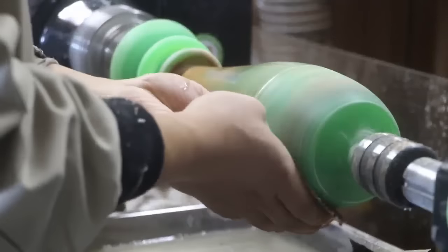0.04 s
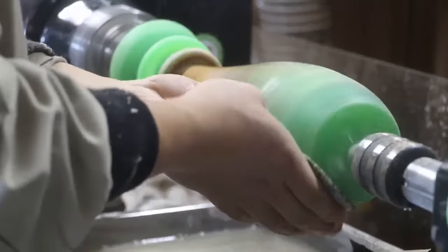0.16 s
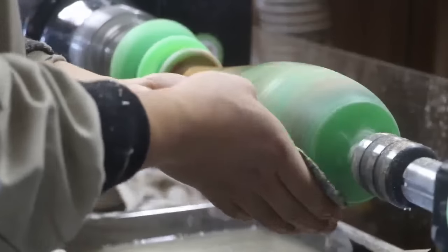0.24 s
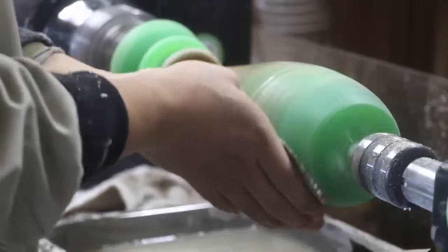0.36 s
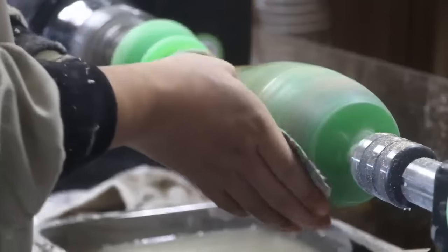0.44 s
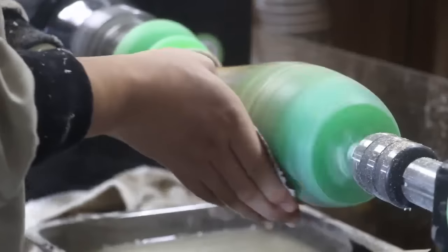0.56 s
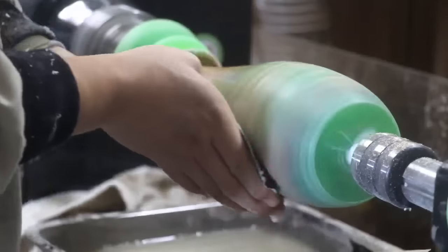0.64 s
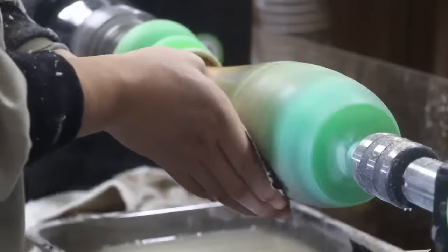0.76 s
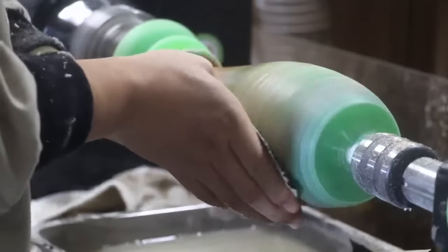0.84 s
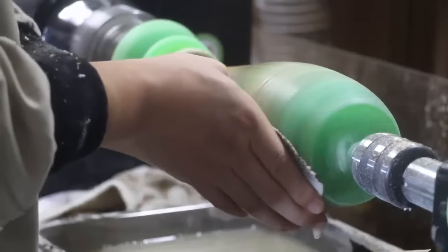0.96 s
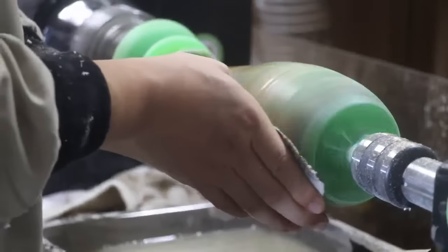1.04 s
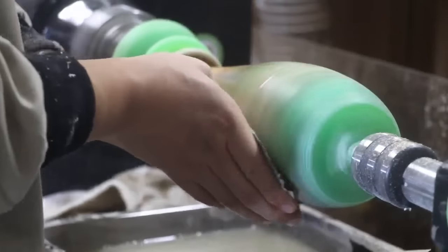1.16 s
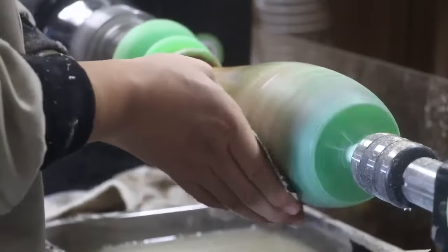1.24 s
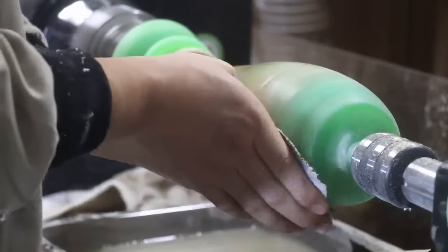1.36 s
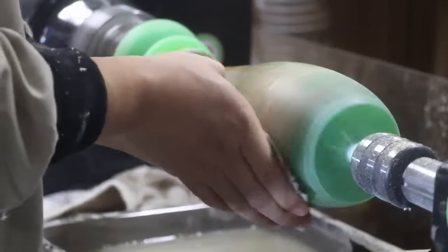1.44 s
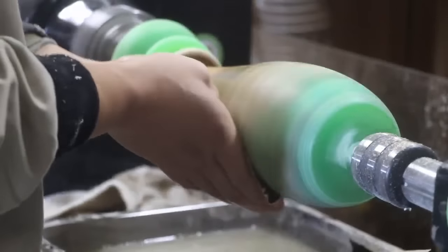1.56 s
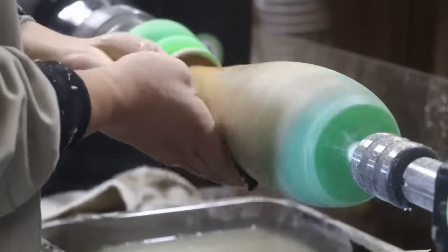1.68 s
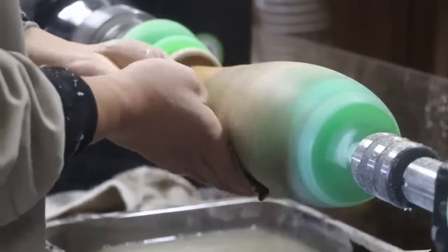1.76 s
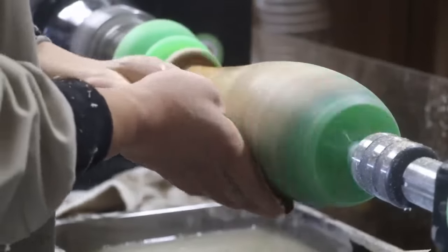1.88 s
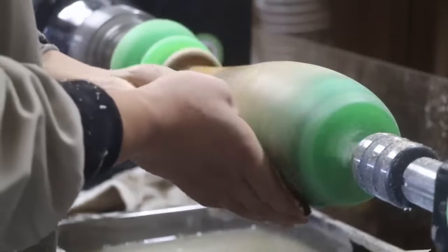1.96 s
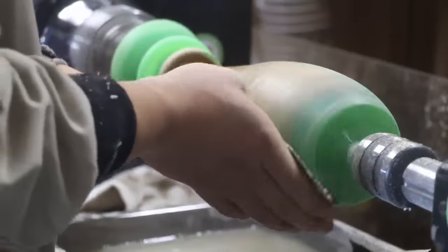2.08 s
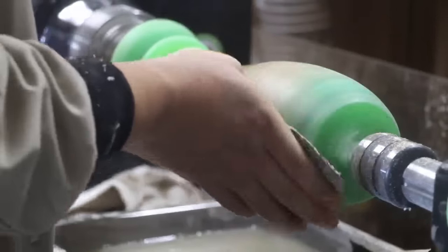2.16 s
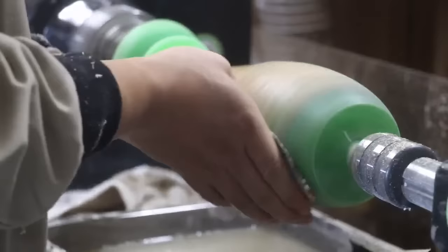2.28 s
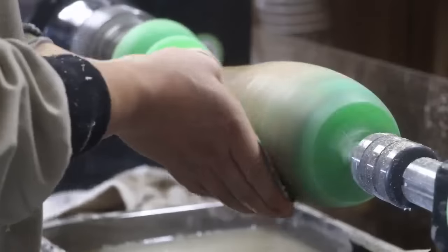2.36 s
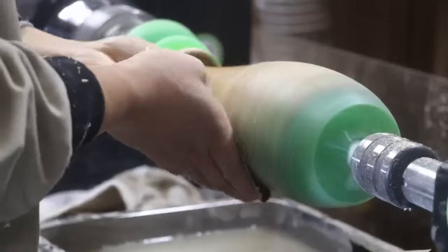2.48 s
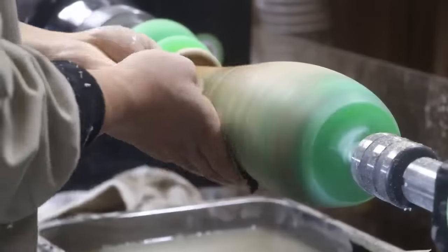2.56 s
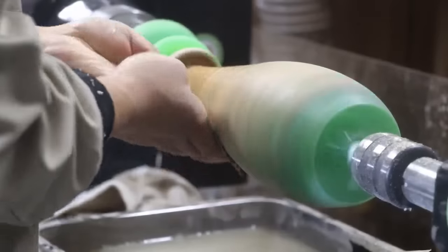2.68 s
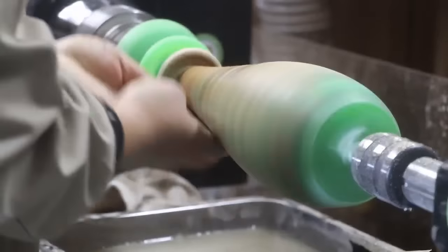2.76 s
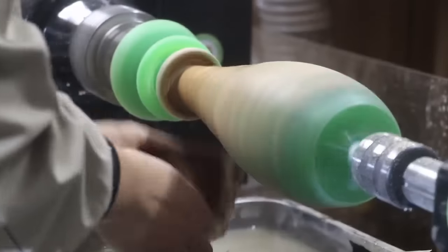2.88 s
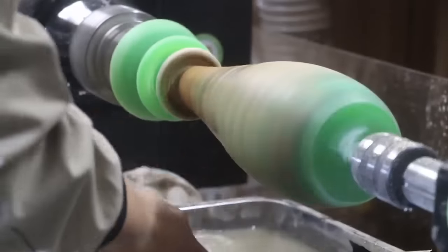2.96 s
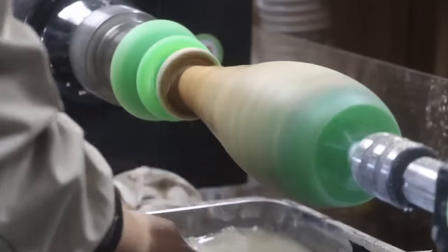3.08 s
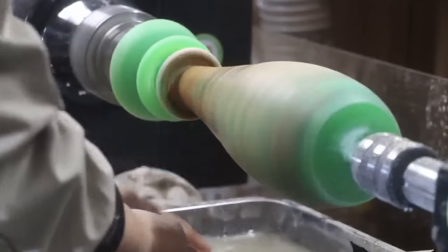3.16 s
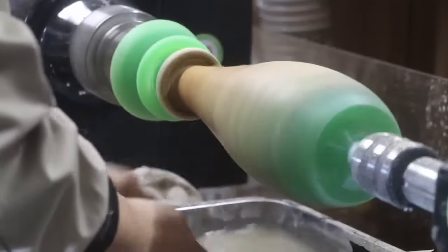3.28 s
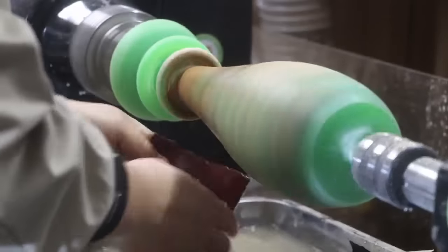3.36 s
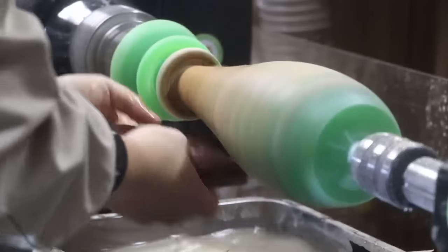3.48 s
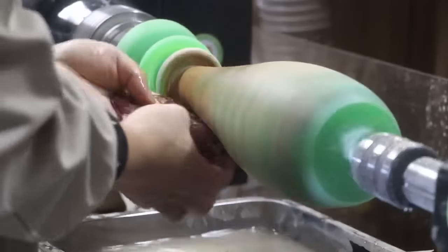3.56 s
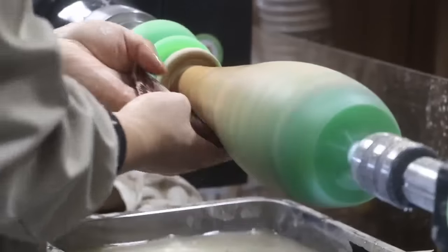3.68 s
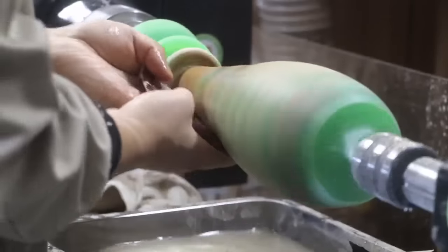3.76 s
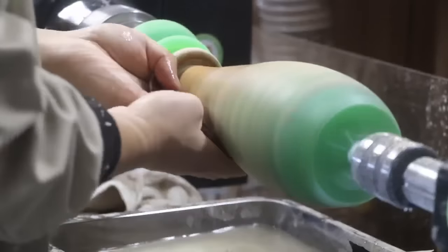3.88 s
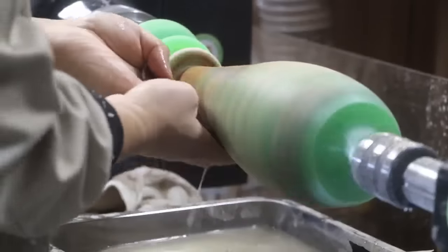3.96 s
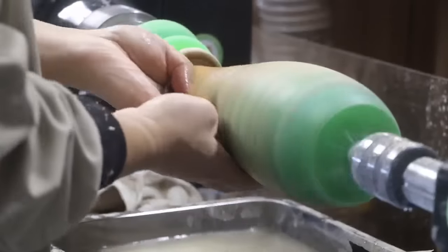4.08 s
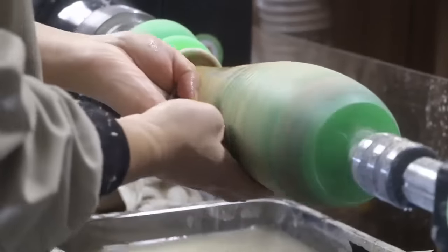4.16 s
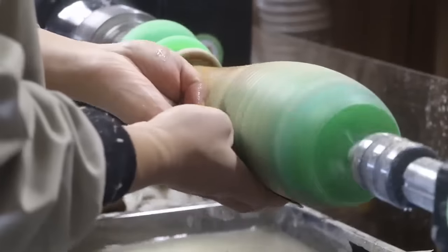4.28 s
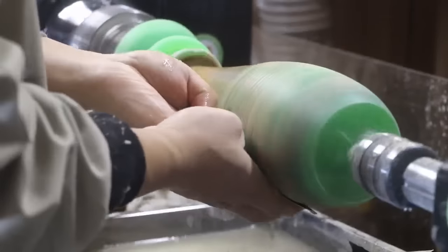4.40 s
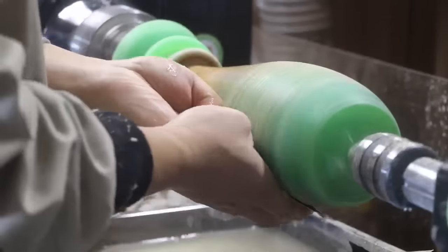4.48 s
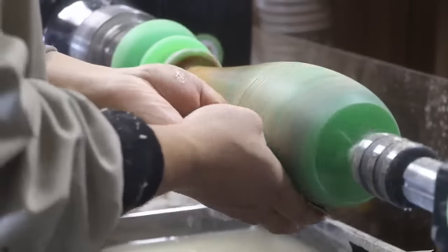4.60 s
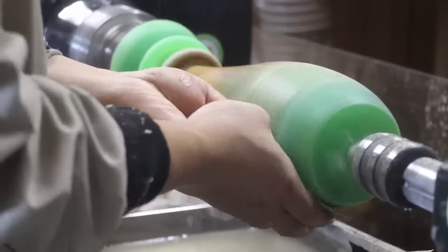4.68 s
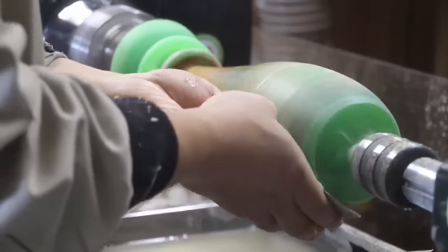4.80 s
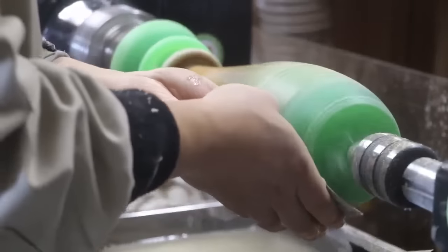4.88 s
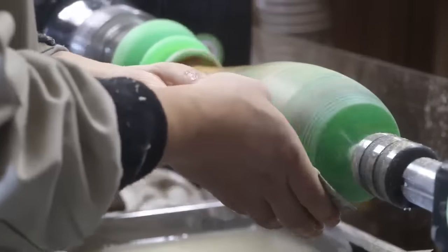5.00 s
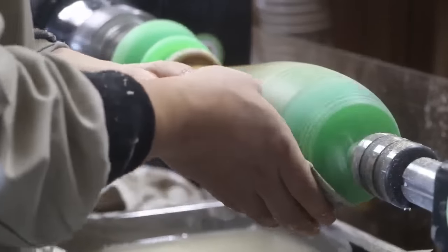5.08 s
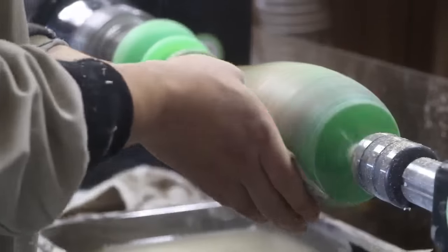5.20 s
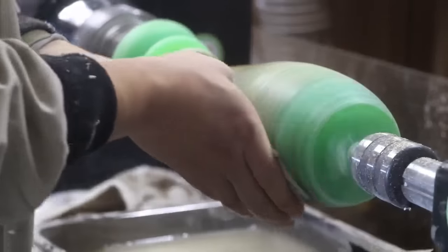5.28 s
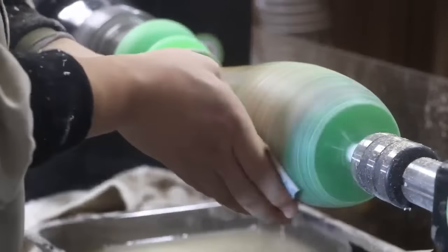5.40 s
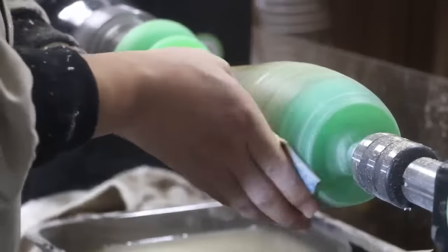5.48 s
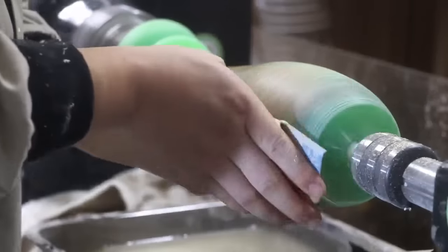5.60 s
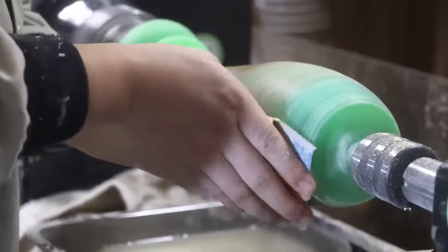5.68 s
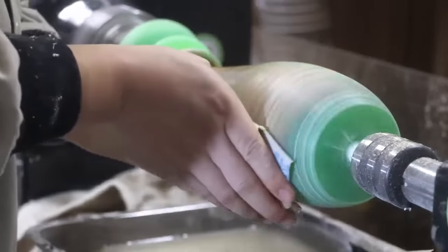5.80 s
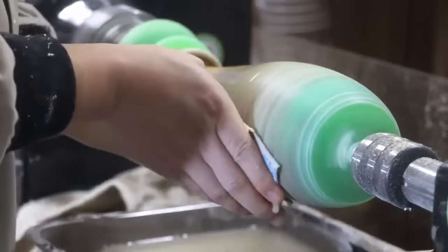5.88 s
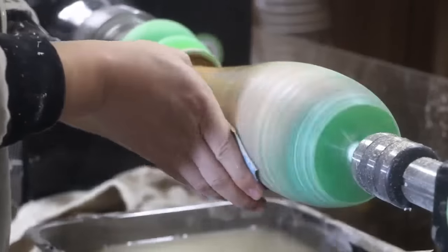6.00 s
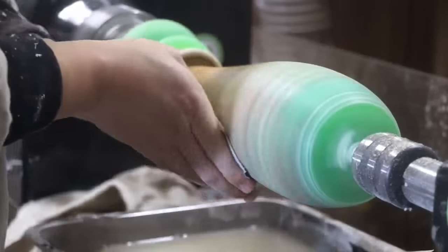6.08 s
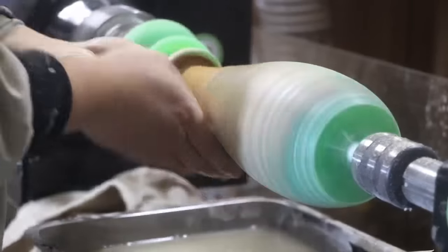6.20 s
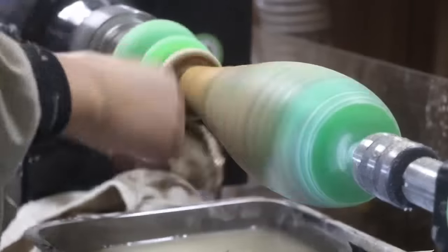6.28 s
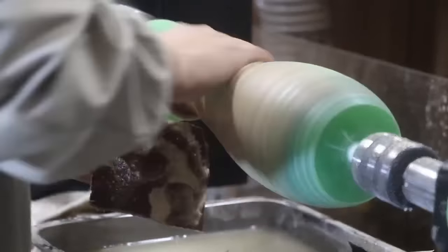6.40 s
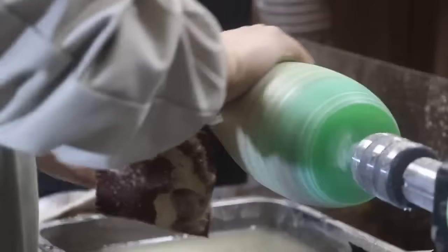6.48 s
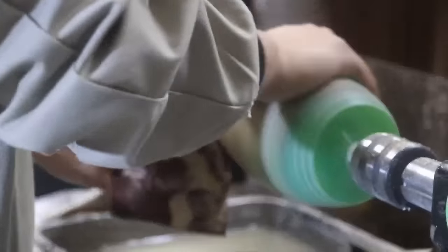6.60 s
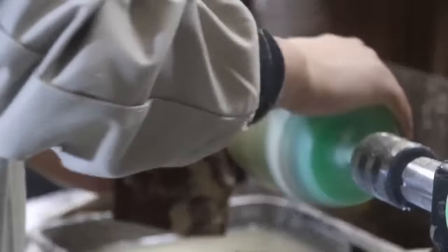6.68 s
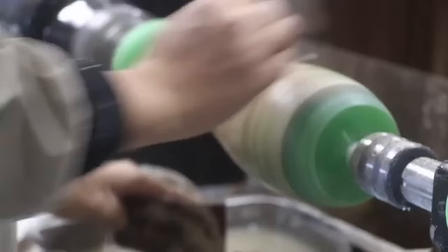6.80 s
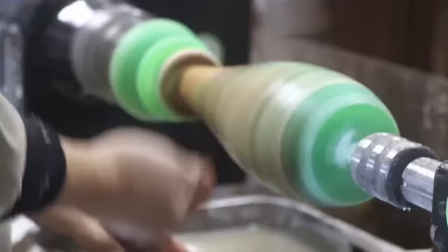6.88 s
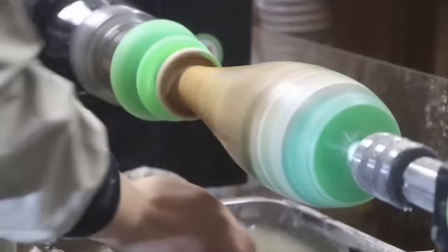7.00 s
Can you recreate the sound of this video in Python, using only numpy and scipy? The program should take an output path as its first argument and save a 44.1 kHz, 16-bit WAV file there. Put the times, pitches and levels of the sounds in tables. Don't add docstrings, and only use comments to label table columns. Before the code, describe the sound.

From 0 s, wet sandpaper is already pressed on a workpiece spinning on a lathe, close and to the right of a stereo microphone. It makes a dense, bright, gritty hiss with a hollow, cupped colour around the upper midrange, surging irregularly as the paper grabs; a small wet squeak catches near 0.65 s and pressure swells around 1.8 s. At about 2.9 s the paper lifts sharply, exposing low motor rumble and mains-like hum. Small splashes, wet chirps and short swishes follow at 3.1-3.5 s as it is rinsed. At 3.63 s the loud rubbing returns abruptly, its hollow tone sliding lower and back, with brief singing wet spots and a strong grab near 5.5 s. It swells and stops at about 6.35 s. Faint palm wipes follow, one swelling until 6.85 s, then a tiny spray tick at 6.93 s over the continuing machine rumble.

```python
import sys
import numpy as np
from scipy import signal
from scipy.io import wavfile
from scipy.ndimage import uniform_filter1d

SR = 44100
rng = np.random.default_rng(int(sys.argv[2]) if len(sys.argv) > 2 else 0)


def generate_wav(sig):
    pcm = np.round(np.clip(np.atleast_2d(sig).T, -1, 1) * 32767).astype(np.int16)
    wavfile.write(sys.argv[1], SR, pcm)


def nominal_scale(level):
    x = np.asarray(level, float) / 20
    return 10 ** x


N = 310905


def sanding():
    grit = scratches(per_s=6000, spread_db=3.5, water=0.6)
    hz, t, z = signal.stft(grit, SR, nperseg=512, noverlap=384)
    power = paper_colour(hz, t) * pockets(hz, t)
    hiss = signal.istft(paired(z, hz) * np.sqrt(power * len(hz)), SR, nperseg=512, noverlap=384)[1][:, :N]
    t = np.arange(N) / SR
    coarse = t[::32]
    level_db = np.interp(t, coarse, contact(coarse) + grabbing(coarse)) + 0.67
    return nominal_scale(level_db) * (nominal_scale(runout(t)) * hiss + nominal_scale(-4.5) * motor_buzz(t))


def scratches(per_s, spread_db, water):
    size = nominal_scale(spread_db * np.minimum(rng.exponential(1, (2, N)), 5))
    sign = rng.choice([-1.0, 1.0], (2, N))
    bites = size * sign * (rng.random((2, N)) < per_s / SR)
    water = np.clip(water, 0, 1)
    return np.sqrt(1 - water) * evened(bites) + np.sqrt(water) * rng.standard_normal((2, N))


# (frequency [Hz], density [dB per Hz])
GRIT_SPECTRUM = [(530, -33.5), (900, -19), (1090, -19), (1440, -7.5), (1920, -7.5), (2230, -5),
                 (2570, -5.5), (3270, -6.5), (4590, -3), (5830, 5.5), (7050, -1.5), (8970, -20),
                 (9810, -30), (12800, -67.5), (21600, -120)]
# (time [s], frequency [Hz], strength [dB])
FREE_EDGE = [(0.0, 3050, -18), (0.8, 3100, -1.5), (1.08, 3370, -1), (1.3, 3500, -10), (1.6, 3300, 2.5),
             (2.12, 3100, 4.5), (2.3, 3360, 1), (2.55, 3160, 5.5), (2.85, 2900, -4), (3.2, 3150, -14),
             (3.47, 3020, -0.5), (4.04, 3320, -4), (4.5, 3000, 4), (4.9, 3800, -9), (5.4, 3170, -1),
             (5.97, 3030, 0.5), (6.25, 3120, 0.5), (6.6, 3200, -11)]


def paper_colour(hz, t):
    edge_s, edge_hz, edge_db = np.transpose(FREE_EDGE)
    edge_hz, edge_db = np.interp(t, edge_s, edge_hz), np.interp(t, edge_s, edge_db)
    fizz_db, full_db, hollow_hz, hollow_db = grip(t, edge_db)
    hollow_hz = hollow_hz * (1 + 0.008 * wander(0.039, t))
    ring = peak(hz, hollow_hz, width_hz=260) + peak(hz, hollow_hz, width_hz=530)
    ring *= nominal_scale(2 * hollow_db + 0.5)
    ring += nominal_scale(2 * edge_db) * peak(hz, edge_hz, width_hz=750)
    patches = rng.standard_normal((len(t), len(hz))).T
    patches = uniform_filter1d(patches, size=3, axis=0)
    patches = evened(uniform_filter1d(patches, size=16, axis=1))
    power = nominal_scale(2 * read(GRIT_SPECTRUM, hz)[:, None] + 2 * 0.66 * patches) * (1 + ring)
    steady = uniform_filter1d(power, size=20, axis=1)
    low, high = steady[hz < 1500].sum(0), steady[hz > 4500].sum(0)
    body = steady.sum(0) - low - high
    full = np.clip((1600 - hz) / 250, 0, 1)[:, None]
    fine = np.clip((hz - 3300) / 2400, 0, 1)[:, None]
    full_gain = (nominal_scale(2 * full_db) * body / low) ** full
    fine_gain = (nominal_scale(2 * fizz_db) * body / high) ** fine
    return power * full_gain * fine_gain / body


# (time [s], frequency [Hz], cupping [dB], wrap of the fingers [dB], wetness [dB])
HAND_SHAPE = [
    [(0.0, 1990, 7, -5, 1.5), (0.45, 1930, 1, -2, 1.5), (0.66, 2100, 2, 2, 2), (0.95, 1920, 5.5, -5, 0.5),
     (1.05, 1970, -5, -0.5, -1.5), (1.6, 2100, 3, 2, 1.5), (2.25, 2130, 2.5, 2, -2.5),
     (2.5, 2170, 7.5, -0.5, 3), (2.78, 2050, -3, -2, 1.5)],
    [(3.67, 1980, -3, 4, 0.5), (3.8, 1780, -4, -5, 1), (4.1, 1630, -1, -8, 0), (4.5, 1950, 9, 1, -2),
     (4.62, 1765, 5.5, 3, -1.5), (5.5, 1714, 5.5, 0.5, 0), (5.8, 1940, -2.5, 4, -0.5),
     (6.17, 1824, 4.5, 7, 4), (6.35, 1890, -2, 2.5, 2.5)],
]
# (fizz [dB], fullness [dB], hollow frequency [Hz], cupping [dB])
RINSE_TONE, WIPE_TONE = (-15, -17, 2054, -3), (-6.5, -11, 1900, -2)
FIZZ_DB, FIZZ_PER_PRESS, FIZZ_PER_GRAB, FIZZ_PER_EDGE = -7, -0.23, -0.13, -0.088
FULL_DB, FULL_PER_HZ, FULL_PER_PRESS = -17, -0.028, -0.32


def grip(t, edge_db):
    s, hz, cup, wrap, wet = np.vstack(HAND_SHAPE).T
    hollow_hz, cup_db = np.interp(t, s, hz), np.interp(t, s, cup)
    press, grab = contact(t) + 35, grabbing(t)
    fizz_db = FIZZ_DB - np.interp(t, s, wet)
    fizz_db = fizz_db + FIZZ_PER_PRESS * press + FIZZ_PER_GRAB * grab + FIZZ_PER_EDGE * edge_db
    full_db = FULL_DB + np.interp(t, s, wrap)
    full_db = full_db + FULL_PER_HZ * (hollow_hz - 2000) + FULL_PER_PRESS * (press + grab)
    rinsing = (t > PRESSURE[0][-1][0]) & (t < PRESSURE[1][0][0])
    wiping = t > PRESSURE[1][-1][0]
    tone = [np.where(rinsing, rinse, np.where(wiping, wipe, rub))
            for rinse, wipe, rub in zip(RINSE_TONE, WIPE_TONE, (fizz_db, full_db, hollow_hz, cup_db))]
    touch_fizz_db = 0.055 * (np.clip(press, -35, -12) + 22)
    tone[0] = tone[0] + (rinsing | wiping) * touch_fizz_db
    return tone


# (time [s], rubbing level [dB])
PRESSURE = [
    [(0.0, -35.5), (0.36, -35.5), (0.72, -34.5), (1.07, -38.5), (1.43, -36), (1.78, -30), (2.14, -39.5),
     (2.49, -34), (2.855, -34.5)],
    [(3.634, -34.5), (3.98, -32.5), (4.32, -37.5), (4.66, -34), (5.0, -35.5), (5.34, -34.5), (5.68, -38.5),
     (6.02, -33.5), (6.352, -30)],
]
# (start [s], end [s], level [dB], swell [dB per s], fade [dB per s])
LIGHT_TOUCHES = [(2.86, 2.9, -51, 904, 173), (3.116, 3.14, -50, 230, 98), (3.207, 3.27, -54.5, 96, 202),
                 (3.325, 3.4, -70, 68, 56), (3.443, 3.481, -55, 101.5, 170.5), (3.54, 3.59, -63, 66, 60),
                 (3.629, 3.63, -49, 285, 895), (6.37, 6.49, -66, 900, 100), (6.53, 6.58, -61, 298, 100),
                 (6.59, 6.845, -52.5, 108.5, 750), (6.955, 7.05, -63.5, 59, 60)]
TOUCH_DB_PER_S, LIFT_DB_PER_S = 2500, 1600


def contact(t):
    power = 1e-9
    for s, db in (np.transpose(one_pass) for one_pass in PRESSURE):
        before, after = np.maximum(s[0] - t, 0), np.maximum(t - s[-1], 0)
        edge_db = TOUCH_DB_PER_S * before + LIFT_DB_PER_S * after
        power = power + nominal_scale(2 * (np.interp(t, s, db) - edge_db))
    for start, end, db, swell, fade in LIGHT_TOUCHES:
        edge_db = swell * np.maximum(start - t, 0) + fade * np.maximum(t - end, 0)
        power = power + nominal_scale(2 * (db - edge_db))
    return 10 * np.log10(power)


# (time [s], extra pressure [dB])
HIGH_SPOTS = [
    [(0.022, 3), (0.122, 4.5), (0.212, 3.2), (0.312, 3), (0.491, 4.1), (0.646, 4), (0.701, -2.0),
     (0.811, 3.5), (0.915, 3), (1.015, 5.5), (1.075, 3.5), (1.205, 5), (1.384, 4.5), (1.439, 2.1),
     (1.499, -2), (1.644, 1.6), (2.093, 6), (2.163, 3.5), (2.532, 0.4), (2.587, 3.5), (2.651, 3.5),
     (2.746, 3.5)],
    [(3.642, 4.5), (3.806, 3), (3.956, 1.5), (4.011, 0), (4.096, 1.5), (4.171, 2), (4.28, 0.9), (4.34, 2.1),
     (4.395, 2.5), (4.595, -3.0), (4.694, -1.5), (4.874, -4), (5.044, -2.1), (5.103, 1.5), (5.223, -2.2),
     (5.283, 2), (5.453, 1.5), (5.542, 6.5), (5.637, 4), (5.832, 2), (5.996, 2.5), (6.141, 1)],
]
# (time [s], extra pressure [dB])
SLIPS = [
    (3.765, -1),
    (6.29, -1),
    (6.318, -1),
]
GRAB_RISE_S, GRAB_FALL_S = 0.013, 0.034


def grabbing(t):
    total_db = 0
    for s, db in HIGH_SPOTS[0] + HIGH_SPOTS[1] + SLIPS:
        spread_s = np.where(t < s, GRAB_RISE_S, GRAB_FALL_S)
        total_db = total_db + db * np.exp(-((t - s) / spread_s) ** 2 / 2)
    return total_db


# (start [s], end [s], frequency [Hz], level over the hiss [dB])
WATER_POCKETS = [(0.645, 0.783, 2150, 4), (0.798, 0.86, 1950, 5), (2.56, 2.63, 2350, 6),
                 (3.113, 3.27, 2170, 5), (3.44, 3.5, 3000, 9), (3.705, 3.768, 1410, 13),
                 (3.79, 3.86, 1780, 2), (4.01, 4.048, 1660, 8), (4.37, 4.402, 1450, 10),
                 (4.41, 4.465, 2300, 6), (4.62, 4.677, 1480, 7), (4.777, 4.82, 1430, 5),
                 (5.086, 5.14, 1930, 5), (5.265, 5.288, 1950, 5), (5.43, 5.46, 1550, 7),
                 (5.632, 5.674, 1890, 9.5), (6.1, 6.183, 3200, 6), (6.15, 6.214, 1230, 6.5),
                 (6.316, 6.331, 1760, 12)]


def pockets(hz, t):
    gain = 1
    for start, end, f, db in WATER_POCKETS:
        fade = np.clip(np.minimum(t - start, end - t) / 0.012 + 1, 0, 1)
        gain = gain + nominal_scale(2 * db) * peak(hz, f + 0 * t, width_hz=200) * fade ** 2
    return gain


def runout(t):
    turn = 2 * np.pi * 6.8 * t
    throb_db = 0.067 * np.cos(turn + 0.26) + 0.11 * np.cos(2 * turn + 6.6)
    ridge_db = 0.5 * np.cos(2 * np.pi * 400 * t)
    flicker_db = 0.7 * wander(0.03, t) + 0.1 * wander(0.009, t)
    return throb_db + ridge_db + flicker_db


# (frequency [Hz], level re the rubbing [dB])
BUZZ_LINES = [(785, -30), (900, -31), (1000, -31), (1266, -26), (5600, -25), (6551, -28), (7984, -41),
              (8017, -41), (8400, -44)]


def motor_buzz(t):
    buzz = 0
    for f, db in BUZZ_LINES:
        level = nominal_scale(db + 2.0 * wander(0.1, t))
        buzz = buzz + level * np.sin(2 * np.pi * (f * t + rng.random((2, 1))))
    return buzz


# (time [s], peak level [dB], frequency [Hz], 60 dB decay [s], tick share [ratio])
SQUEAKS = [(.632, -26, 2150, .016, .15), (.6495, -26, 2150, .016, .1), (.6528, -15, 2200, .012, .3),
           (.8065, -26, 1960, .02, .2), (3.106, -42, 1700, .025, .05), (3.1105, -31, 2000, .024, .08),
           (3.112, -38, 1680, .04, .0), (3.1165, -34, 2080, .024, .05), (3.122, -35, 1850, .022, .05),
           (3.4395, -40, 2950, .025, .5), (3.4395, -44, 3750, .02, .3), (3.635, -30, 2170, .02, .2),
           (6.1645, -25, 2050, .02, .2)]
# (time [s], peak level [dB])
SPRAY_TICKS = [
    (3.3942, -62),
    (3.443, -60),
    (6.9331, -53),
]


def catches():
    length = 4000
    out, t = np.zeros(N + length), np.arange(length) / SR
    band = signal.butter(4, [1500, 6500], "bandpass", fs=SR, output="sos")
    for s, db, hz, t60, share in SQUEAKS + [(s, db, 0, 1, 1) for s, db in SPRAY_TICKS]:
        detune, chance = rng.random(2)
        upper_hz = hz * (1.06 + 0.08 * detune)
        tone = np.sin(2 * np.pi * hz * t) + 0.067 * np.sin(2 * np.pi * upper_hz * t)
        burst = rng.standard_normal(length) * np.exp(-t / (0.00095 + 0.00048 * chance))
        tick = share * signal.sosfilt(band, burst)
        swell = nominal_scale(-60 * t / t60) * (1 - np.exp(-t / 0.0008))
        at = round(s * SR)
        out[at:at + length] += nominal_scale(db) * (tone * swell / swell.max() + tick)
    return out[:N] * nominal_scale(np.array([[-3.5], [3.0]]))


# (time [s], rumble level [dB], hum level [dB])
MACHINE_LEVELS = [(0.0, -53, -69.5), (0.6, -53.5, -74), (1.2, -52.5, -72.5), (1.4, -52.5, -74),
                  (1.75, -53, -69), (2.15, -57, -74), (2.8, -58.5, -81), (3.3, -52, -69), (3.66, -55, -88),
                  (3.94, -62, -87), (4.02, -58.5, -64), (4.3, -57, -67.5), (4.77, -52.5, -60.5),
                  (5.3, -52, -65), (5.45, -51, -73.5), (6.001, -52, -62), (6.3, -53, -58.5),
                  (6.7, -52, -55.5)]


def lathe():
    s = np.arange(0, N / SR, 0.005)
    level_s, rumble_db, hum_db = np.transpose(MACHINE_LEVELS)
    slack = np.minimum(contact(s) + 35, 0)
    rumble_db = np.interp(s, level_s, rumble_db) + 0.56 * slack
    hum_db = np.interp(s, level_s, hum_db) + 0.38 * slack
    rumble = bearing_rumble(s, rumble_db, hum_db)
    t = np.arange(N) / SR
    hum = motor_hum(t, np.interp(t, s, hum_db)) + 0.69 * evened(bed_throb())
    return nominal_scale(np.interp(t, s, rumble_db) + 2.5) * evened(rumble) + nominal_scale(np.interp(t, s, hum_db)) * hum


# (frequency [Hz], density [dB per Hz])
RUMBLE_SPECTRUM = [(15, -42), (25, -26), (92, -19.5), (279, -9.5), (409, -5.5), (524, -7.5), (805, -5),
                   (1050, -10.5), (1300, -5), (1690, -24), (2860, -120)]


def bearing_rumble(s, rumble_db, hum_db):
    depth_db = -6 - 0.4 * (rumble_db + 61) + 0.068 * (hum_db + 77.5)
    since = s - PRESSURE[1][0][0]
    depth_db = depth_db - 11.5 * (since > 0) * np.exp(-abs(since) / 0.12)
    hz, t, z = signal.stft(rng.standard_normal((2, N)), SR, nperseg=2048)
    deep = np.clip((330 - hz) / 140, 0, 1)[:, None]
    colour = nominal_scale(read(RUMBLE_SPECTRUM, hz)[:, None] + deep * (np.interp(t, s, depth_db) + 12))
    return signal.istft(paired(z, hz) * colour, SR, nperseg=2048)[1][:, :N]


# (frequency [Hz], level [dB], left lead [turns])
HUM_LINES = [(51, -5, 0.17), (103.2, -0.5, 0.083), (149, -3, 0.14), (207, -10.5, 0.071), (251.7, -5, 0.076),
             (300, -11, .1), (408, -6, 0.062)]


def motor_hum(t, hum_db):
    hum = 0
    for f, db, lead in HUM_LINES:
        lag_db = (f > 120) * 0.46 * (hum_db + 73.5)
        level = nominal_scale(db + 2.0 * wander(0.098, t) - lag_db)
        hum = hum + level * np.sin(2 * np.pi * (f * t + [[lead], [0]]))
    return hum


def bed_throb():
    hz, _, z = signal.stft(rng.standard_normal((2, N)), SR, nperseg=4096)
    mode = 1 / (1 + ((hz[:, None] - 90) / 18) ** 4)
    return signal.istft(paired(z, hz) * mode, SR, nperseg=4096)[1][:, :N]


# (frequency [Hz], left-right likeness [ratio])
LIKENESS = [(40, 0.37), (80, 0.17), (200, 0.71), (500, 0.63), (900, 0.69), (2000, 0.39), (9000, 0.42)]
# (frequency [Hz], left minus right [dB])
LEFT_TILT = [(60, -1), (140, 1), (320, 0), (750, -2.5), (1740, -7.0), (4030, -7), (9360, -4.5)]


def paired(z, hz):
    same = np.clip(read(LIKENESS, hz), -1, 1)[:, None]
    tilt = nominal_scale(read(LEFT_TILT, hz) / 2)[:, None]
    left = same * z[0] + np.sqrt(1 - same ** 2) * z[1]
    return np.array([tilt * left, z[0] / tilt])


def peak(hz, centre_hz, width_hz):
    return 1 / (1 + (2 * (hz[:, None] - centre_hz) / width_hz) ** 2) ** 2


def wander(smooth_s, t):
    steps = rng.standard_normal(N // 32 + 1)
    at = np.arange(len(steps)) * 32 / SR
    slow = signal.lfilter([1], [1, -np.exp(-32 / SR / smooth_s)], steps)
    return np.interp(t, at, evened(uniform_filter1d(slow, size=3)))


def read(points, hz):
    f, value = np.transpose(points)
    return np.interp(np.log(hz + 1), np.log(f + 1), value)


def evened(x):
    return x / np.sqrt(np.mean(x ** 2) + 1e-20)


def scene():
    return sanding() + catches() + lathe()


def roll_off(x):
    return signal.sosfilt(signal.butter(12, 10050, fs=SR, output="sos"), x)


def record(dry):
    dull = signal.sosfilt(signal.butter(10, 9800, fs=SR, output="sos"), dry)
    return roll_off(dull + 0.00134)


dry = scene()
out = record(dry)
generate_wav(out)
```